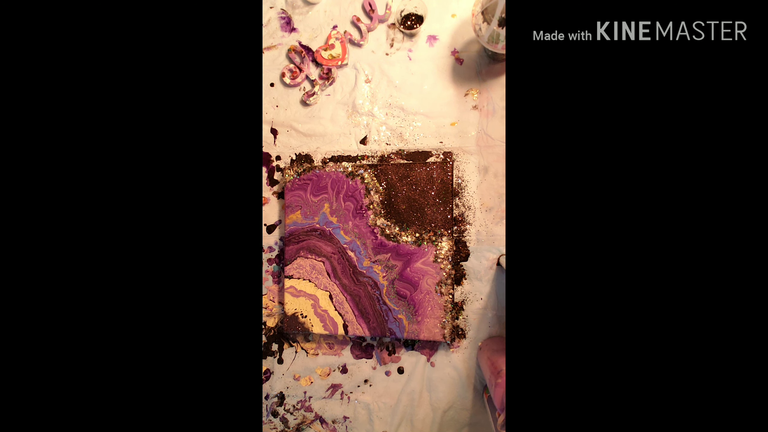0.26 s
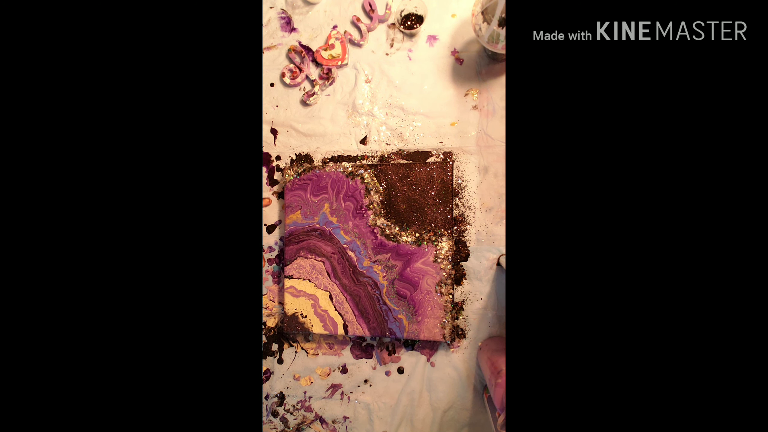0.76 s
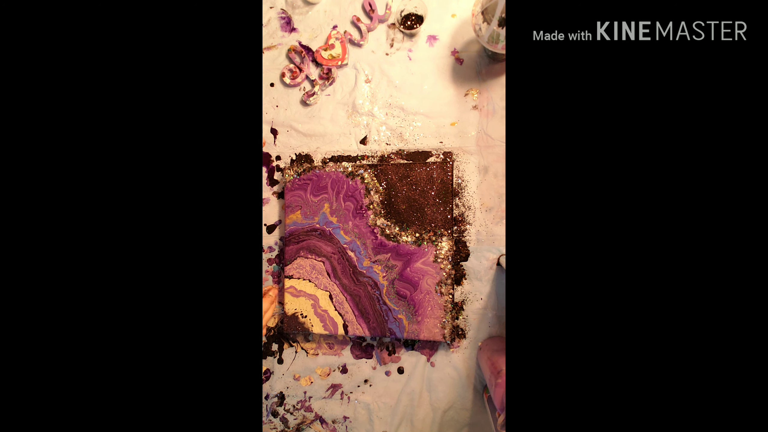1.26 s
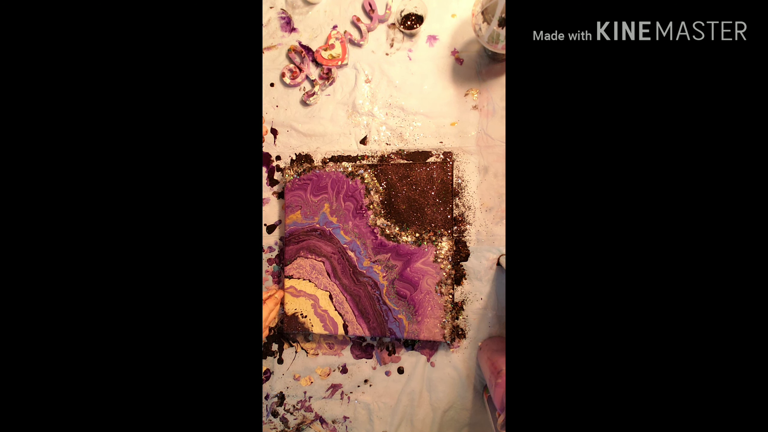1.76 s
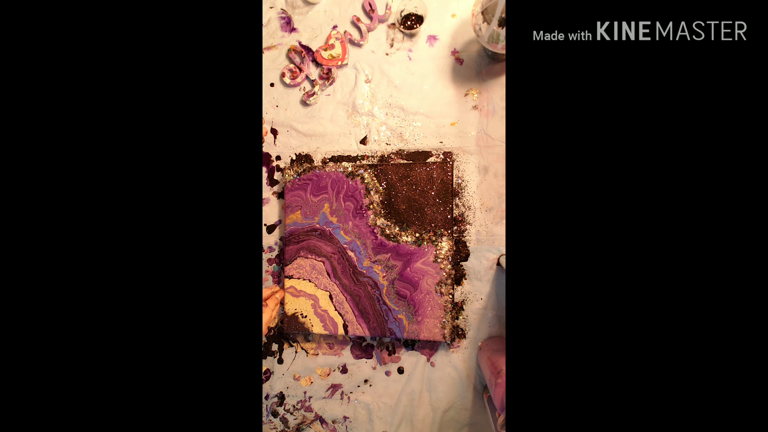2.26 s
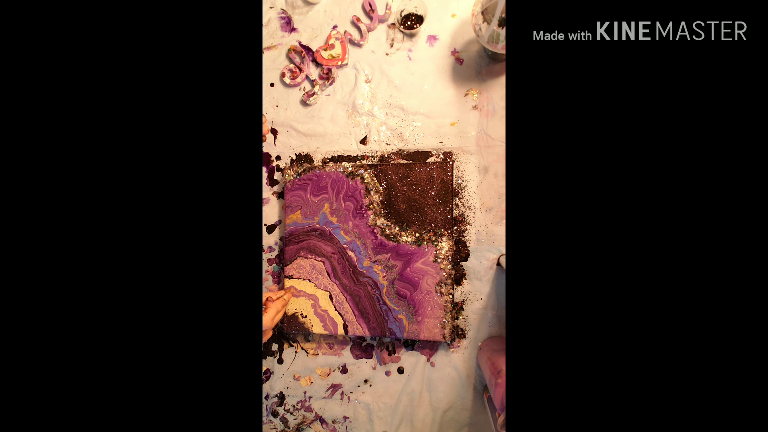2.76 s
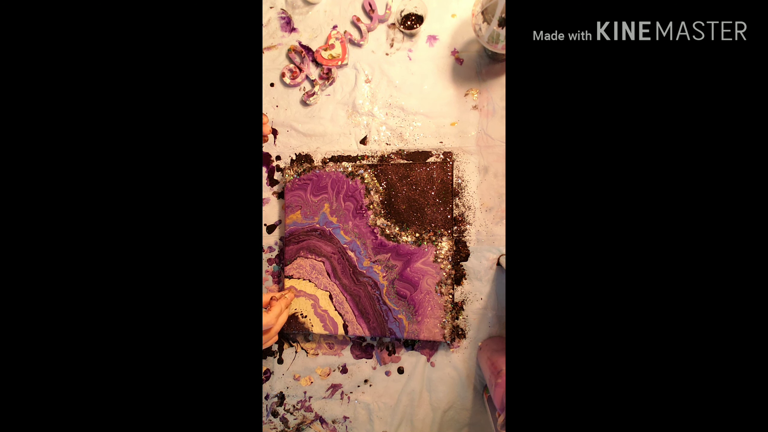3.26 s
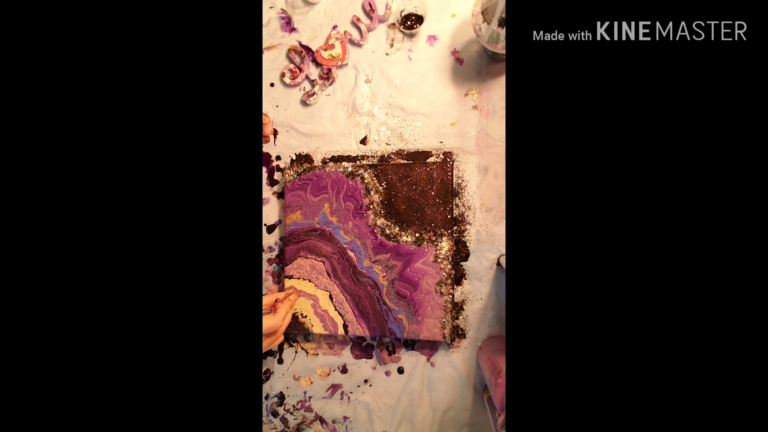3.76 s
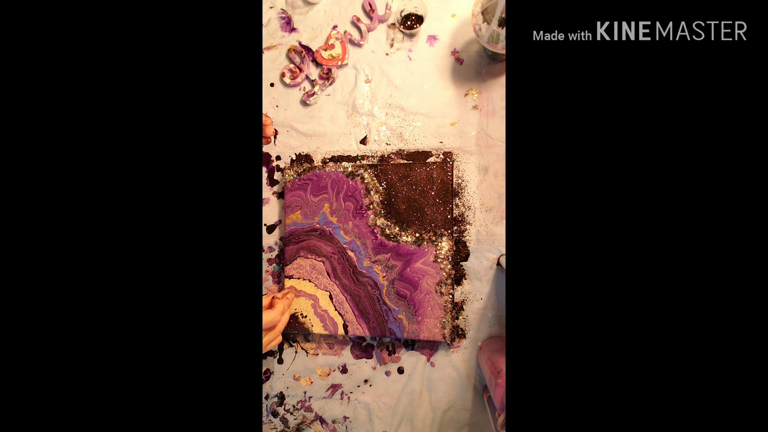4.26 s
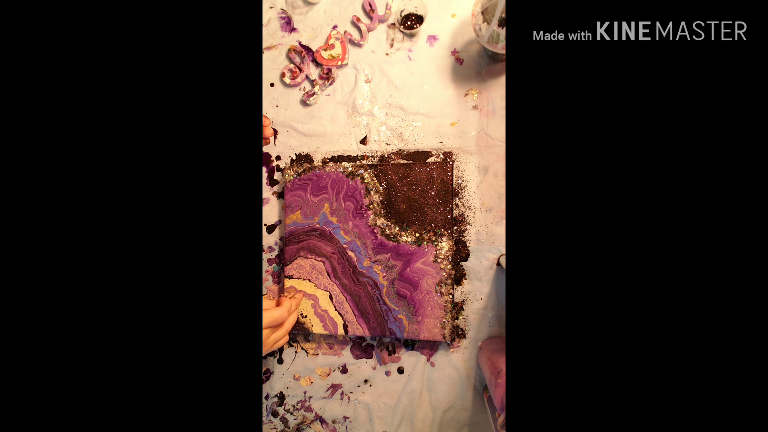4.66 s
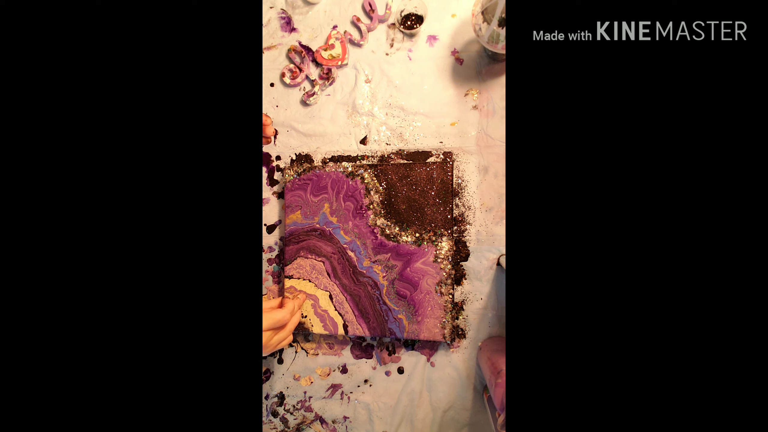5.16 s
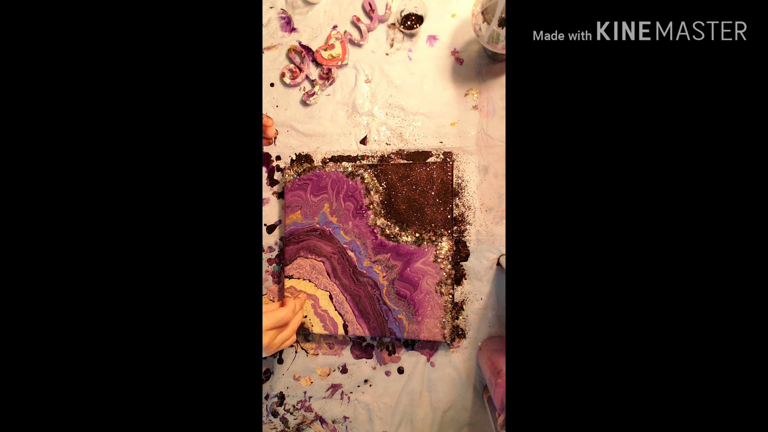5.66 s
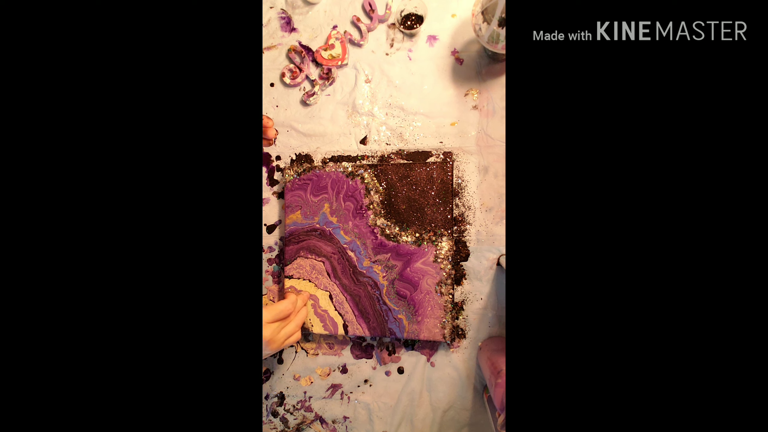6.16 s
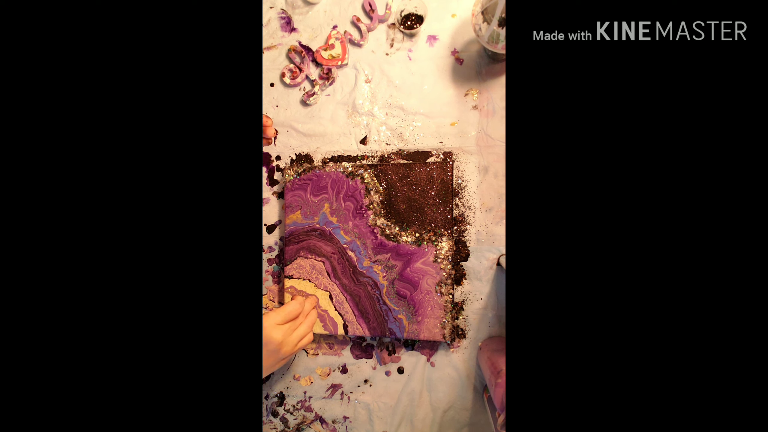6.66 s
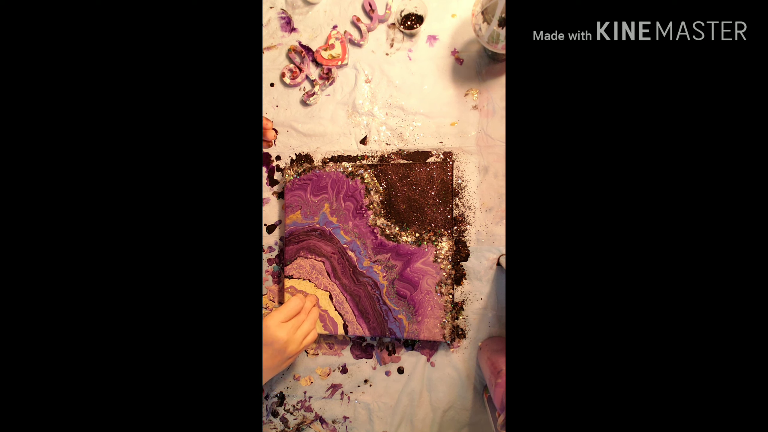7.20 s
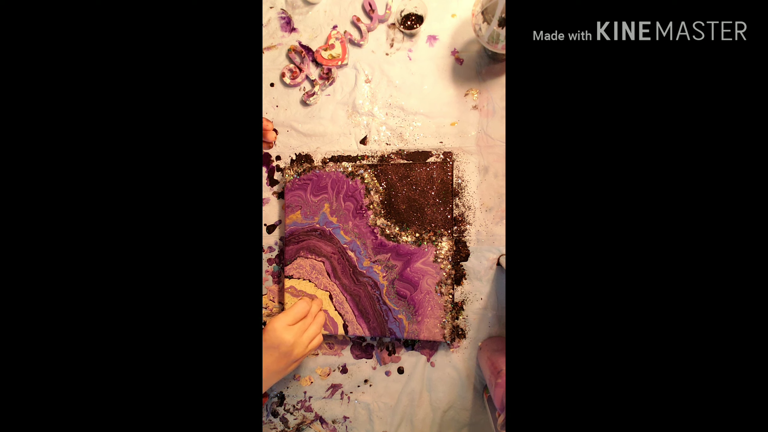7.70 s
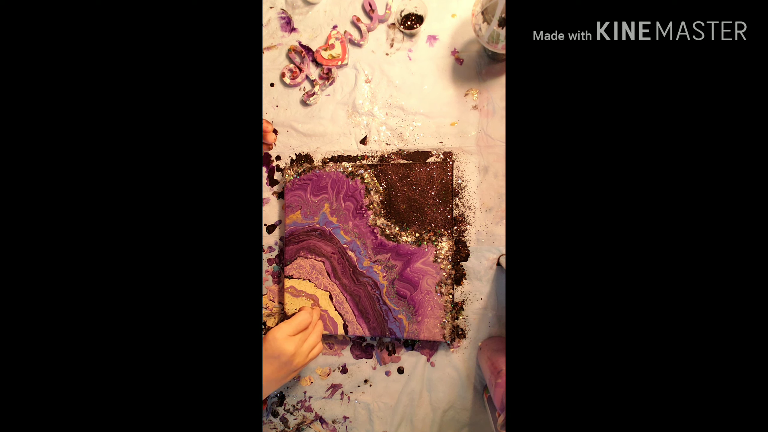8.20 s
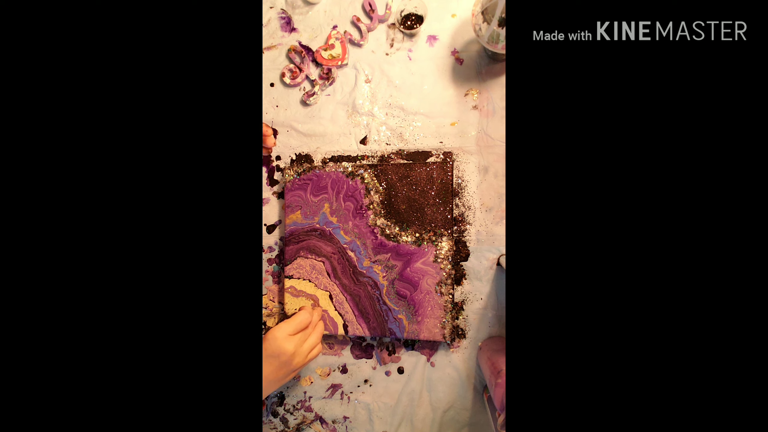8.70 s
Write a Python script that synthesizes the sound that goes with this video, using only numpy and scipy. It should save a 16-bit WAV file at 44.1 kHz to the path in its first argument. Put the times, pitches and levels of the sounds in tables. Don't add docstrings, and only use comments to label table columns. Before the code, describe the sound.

In a quiet indoor workspace, several motors beyond the wall hum continuously at close low pitches, pulsing as they beat together over rumbling air. A faint bird whistle falls away early, then one tiny bright fingernail tick. Two more whistles follow, then a barely audible one, and finally a clearer pair late on. The stereo phone microphone adds soft, smooth hiss.

```python
import sys
import numpy as np
from scipy import signal
from scipy.fft import irfft
from scipy.io import wavfile
from scipy.ndimage import uniform_filter1d

SR = 44100
rng = np.random.default_rng(int(sys.argv[2]) if len(sys.argv) > 2 else 0)


def unload_wav(signal):
    wavfile.write(
        sys.argv[1],
        SR,
        np.round(np.clip(np.atleast_2d(signal).T, -1, 1) * 32767).astype(np.int16),
    )


def boost(x):
    u = np.asarray(x, float) / 20
    return 10 ** u


N = 394254


def walk(rate):
    hold = int(SR / rate)
    steps = np.repeat(rng.standard_normal(N // hold + 1), hold)
    return 0.99 * uniform_filter1d(uniform_filter1d(steps, hold), hold)[:N]


def ports(pan_db):
    return boost(np.array([pan_db, -pan_db]) / 2)


def along(hz, table):
    points, *columns = np.transpose(table)
    return [np.interp(np.log(hz + 1), np.log(points), column) for column in columns]


def noise(hz, db):
    real, imaginary = rng.standard_normal((2, len(hz)))
    return (real + 1j * imaginary) * boost(db) * np.sqrt((len(hz) - 1) * SR / 2)


# multiple of the shaft rate, level in dB, left minus right in dB, left lead in radians.
COMPRESSOR = (58.643, 0, .01), [(2, -45, -.2, .25), (3, -64, -10, 0), (4, -74, 0, .2)]
COMPRESSOR_UNBALANCE = (58.643, .99, .02), [(1, -49.5, -1.1, .24)]
PUMP = (59.335, .99, .04), [(1, -50, -1, .26)]
SECOND_PUMP = (58.99, .99, .01), [(1, -56, -1, .25)]
MAINS = (120.037, 0, .005), [(1, -45, 1.1, .11), (2, -68, .3, .12), (3, -80, 0, 0)]
SLOW_FAN = (18.327, .03, .003), [(1, -74, -1, .3), (2, -55, -.8, .4), (5, -63, 0, .2), (6, -51.5, -.4, .24),
            (7, -58, -1.4, .16), (8, -67, -1.3, .26), (9, -68, -.7, .3)]
SMALL_FAN = (22.58, .4, .015), [(3, -54.5, -.5, .08), (4, -55, -.2, .2), (4.5, -57, 2, .4),
             (12, -77, 0, .2)]
BLOWER = (194.96, 0, .25), [(1, -48.8, -4.7, .8), (2, -62, -7, .42), (3, -82, -7, .4)]
BUZZ = (68.46, .2, .03), [(1, -59.5, -.5, .1), (1.469, -60, 1, 0), (2.02, -66, 0, .2),
        (2.122, -64.5, 0, .2), (2.611, -71, -8, .6)]
WHINE_LOW = (1121.345, .21, .03), [(1, -75.2, -5.5, 2.05)]
WHINE_HIGH = (1122.68, .21, .03), [(1, -78.8, 5.5, 1.37)]
ELECTRONICS = (1, 0, 0), [(3545.3, -103, -5, .4), (3899.8, -100, -.6, -.4), (7385.9, -108, 0, 0),
               (8213.3, -104, 0, 1), (8331.4, -105, 0, 1), (15362, -103, -2, 1)]


def machine(shaft, lines):
    shaft_hz, in_step, wander_hz = shaft
    turns = shaft_hz * (np.arange(N) / SR - in_step)
    drift = np.cumsum(wander_hz * walk(3)) / SR
    turns = turns + drift - uniform_filter1d(drift, 3 * SR)
    load = np.sqrt(2) * boost(0.21 * walk(1.826))
    out = np.zeros((2, N))
    for multiple, db, pan_db, lead in lines:
        cycles = multiple * turns
        phase = (2 * np.pi * (cycles - np.floor(cycles))).astype(np.float32)
        left, right = boost(db) * ports(pan_db)
        out[0] += left * np.cos(phase + np.float32(lead / 2))
        out[1] += right * np.cos(phase - np.float32(lead / 2))
    return load * out


def machine_hum():
    machines = (COMPRESSOR, COMPRESSOR_UNBALANCE, PUMP, SECOND_PUMP, MAINS, SLOW_FAN,
                SMALL_FAN, BLOWER, BUZZ, WHINE_LOW, WHINE_HIGH, ELECTRONICS)
    return sum(machine(shaft, lines) for shaft, lines in machines)


# frequency in Hz, level in dB per Hz, left minus right in dB,
# likeness of the ports from 0 to 1, left lead in radians.
AIR = [(14.9, -95, -2.5, 0.4, 0.13), (23, -83.5, -4, 0.9, 0.27), (34.4, -65, -1, 1, .3),
       (49, -69.5, -6, 1, .25), (65.6, -60, -.5, 0.98, 0.37), (91, -63.5, 1.5, 1, 0.052),
       (128, -62.5, -1, 0.99, 0.22), (151.4, -72.5, -5, .94, 0.41), (206, -78.5, -2.5, 0.9, 0.46),
       (333, -81, -2, 0.84, 0.99), (570, -94, -2.5, 0.8, 0.95), (826, -92.5, -2, 0.2, 1.5),
       (1169, -96.5, -2.5, 0.7, 2.21), (1640, -113, 0, 0.5, 2.7), (3980, -130, 3.5, 0.12, 3.7)]
# frequency in Hz, width in Hz, lift in dB.
DUCT = [(99, 5.1, 1), (118.4, 5.3, 6), (190, 13, 8.5), (247.4, 9.5, 5), (347, 19, -4), (386, 24, 6.5),
        (481, 75, 5), (595, 8.8, 2), (773, 17, 4.5), (990, 10, 7), (1222, 18, 6.5)]
# time in seconds, level in dB.
FLOW = [(0, -54.5), (1.5, -56.5), (2.5, -55), (3.2, -56), (5.001, -55.5), (6, -55.5), (7.7, -55.5),
        (8.94, -55)]


def air(hz):
    db, pan_db, likeness, lead = along(hz, AIR)
    for centre_hz, width_hz, lift_db in DUCT:
        db = db + lift_db / (1 + (2 * (hz - centre_hz) / width_hz) ** 2)
    likeness = np.clip(likeness, 0, 1)
    shared = noise(hz, db) * np.sqrt(likeness)
    pair = []
    for side in (1, -1):
        own = noise(hz, db) * np.sqrt(1 - likeness)
        pair.append(shared * np.exp(side * .5j * lead) + own)
    flow_db = np.interp(np.arange(N) / SR, *np.transpose(FLOW))
    gust_db = 1.1 * (flow_db - flow_db.mean()) + 0.27 * walk(4)
    return irfft(ports(pan_db) * pair)[:, :N] * boost(gust_db)


# frequency in Hz, level in dB per Hz, left minus right in dB.
HISS = [(600, -114, 1), (1770, -113, -0.5), (2480, -114.5, 1.5), (4050, -119.5, -0.5), (6100, -123.5, 1.5),
        (7660, -120, 4), (9100, -123.5, -0.5), (10800, -120, -1.5), (11900, -115, -2.5), (13000, -117, -3),
        (15300, -115, -2.5)]


def hiss(hz):
    db, pan_db = along(hz, HISS)
    db = db - 24 * np.clip(np.log2(600 / (hz + 1)), 0, None)
    return irfft(ports(pan_db) * [noise(hz, db), noise(hz, db)])[:, :N]


# start in seconds, length in seconds, level in dB,
# swell through the note in dB, pitch sag in Hz per second.
WHISTLES = [
    (0.182, 0.35, -82.5, -6, 1400),
    (1.822, 0.29, -76, 5, 1120),
    (2.4, 0.32, -72, -8, 1053),
    (3.265, .335, -89.5, -3, 1150),
    (6.33, 0.29, -68.5, 5.5, 1070),
    (6.843, 0.33, -68.5, -7, 1080),
]
PEAK_HZ, SCOOP_HZ, SCOOP_S = 3494, 35, .015
HOLD_S, KNEE_S = .07, .025
ATTACK_S, RELEASE_S, EDGE_DB = 0.036, 0.046, -11
BURR_HZ, BURR_START, BURR_END = 105, .2, .8
OCTAVE_START_DB, OCTAVE_END_DB, OCTAVE_PAN_DB = -27.5, -10, 10
PAN_START_DB, PAN_END_DB, PAN_SWAY_DB = -1.5, -9, 2
FLICKER_DB, FLICKER_PER_DB_FAINTER, NEAR_DB = 3, 0.24, -72.5


def bird():
    out, waver, pulse = np.zeros((2, N)), walk(90), walk(40)
    for start, length, level_db, swell_db, sag in WHISTLES:
        t = np.arange(int(length * SR)) / SR
        at, share = int(start * SR) + np.arange(len(t)), t / length
        scoop = SCOOP_HZ * np.exp(-t / SCOOP_S)
        fall = sag * KNEE_S * np.logaddexp(0, (t - HOLD_S) / KNEE_S)
        hz = PEAK_HZ - scoop - fall

        burr = np.clip(BURR_START + (BURR_END - BURR_START) * share, 0, 1)
        phase = 2 * np.pi * np.cumsum(hz * (1 + 0.011 * burr * waver[at])) / SR
        burr_phase = 2 * np.pi * np.cumsum(BURR_HZ * (1 + .3 * pulse[at])) / SR
        throb = 1 + burr * np.sin(burr_phase)
        phase = phase + np.array([[-.6], [.6]])

        octave_db = OCTAVE_START_DB + (OCTAVE_END_DB - OCTAVE_START_DB) * np.minimum(share / .7, 1) ** 2
        octave = boost(octave_db) * ports(OCTAVE_PAN_DB)[:, None] * throb * np.sin(2 * phase)
        voice = throb / np.sqrt(1 + burr ** 2 / 2) * (np.sin(phase) + octave)

        edges = np.clip(1 - t / ATTACK_S, 0, 1) + np.clip(1 - (length - t) / RELEASE_S, 0, 1)
        db = level_db + swell_db * (share - .5) + EDGE_DB * edges
        flicker_db = FLICKER_DB + FLICKER_PER_DB_FAINTER * max(NEAR_DB - level_db, 0)
        db = db + flicker_db * pulse[::-1][at]
        pan_db = PAN_START_DB + (PAN_END_DB - PAN_START_DB) * share + PAN_SWAY_DB * pulse[at // 2]
        out[:, at] += voice * signal.windows.tukey(len(at), .06) * boost(db) * ports(pan_db)
    return out


ROOM_T60_S, ROOM_DB = .32, -6.5


def room(x):
    t = np.arange(int(SR * .6)) / SR
    fade = np.exp(-np.log(1000) * t / ROOM_T60_S)
    tail = rng.standard_normal((2, len(t))) * fade * (t > .006)
    tail = tail / np.sqrt(np.sum(tail ** 2, axis=1, keepdims=True))
    return x + boost(ROOM_DB) * signal.fftconvolve(x, tail, axes=1)[:, :N]


# start in seconds, peak level in dB, pitch in Hz, 60 dB decay in seconds.
TICK = [
    (1.031, -67, 10280, 0.0056),
    (1.037, -75.5, 10500, 0.0031),
]


def tick():
    out, t = np.zeros(N), np.arange(1000) / SR
    for start, db, hz, t60 in TICK:
        grain = 1 + rng.standard_normal(len(t))
        snap = np.sin(2 * np.pi * hz * t) * grain * np.exp(-np.log(1000) * t / t60)
        at = int(start * SR)
        out[at:at + len(t)] += boost(db) * snap
    return out


def scene():
    hz = np.fft.rfftfreq(2 ** 19, 1 / SR)
    return machine_hum() + air(hz) + hiss(hz) + room(bird()) + tick()


def low_pass(x):
    return signal.sosfilt(signal.butter(12, 15490, fs=SR, output="sos"), x)


def record(dry):
    return low_pass(dry)


dry = scene()
out = record(dry)
unload_wav(out)
```